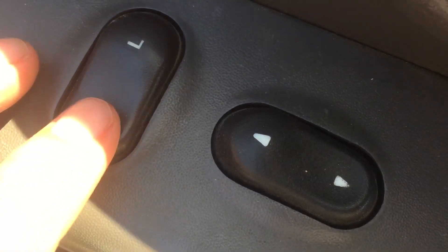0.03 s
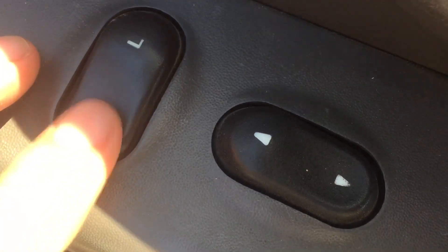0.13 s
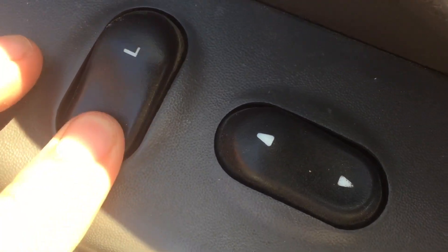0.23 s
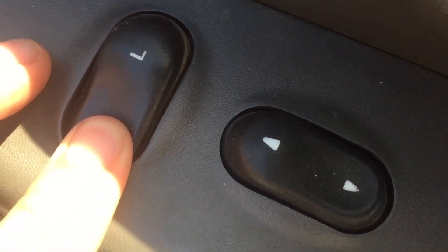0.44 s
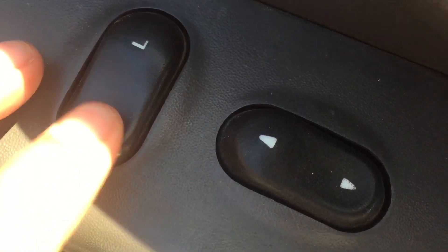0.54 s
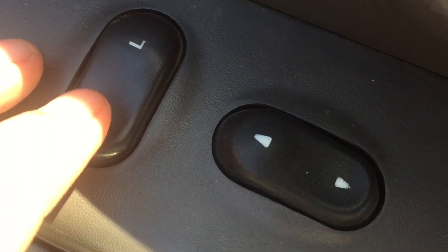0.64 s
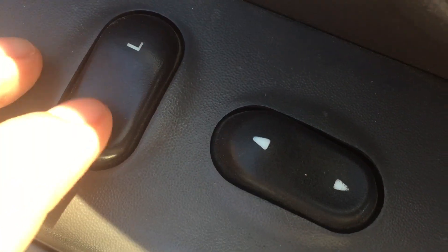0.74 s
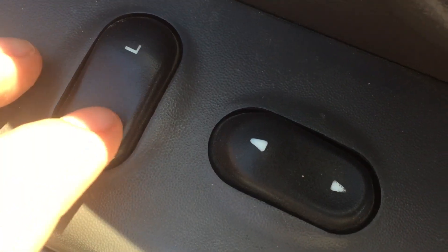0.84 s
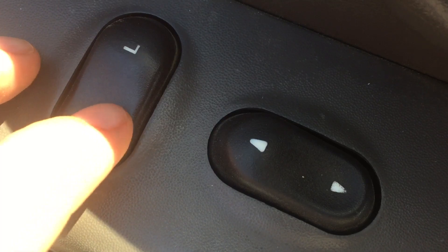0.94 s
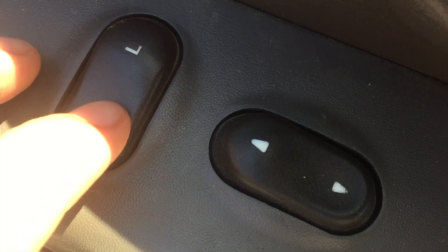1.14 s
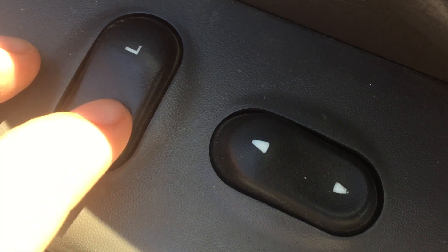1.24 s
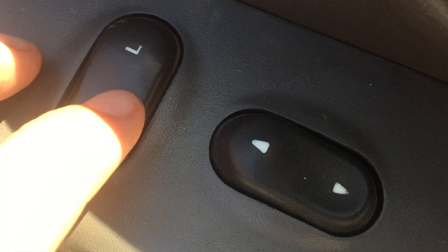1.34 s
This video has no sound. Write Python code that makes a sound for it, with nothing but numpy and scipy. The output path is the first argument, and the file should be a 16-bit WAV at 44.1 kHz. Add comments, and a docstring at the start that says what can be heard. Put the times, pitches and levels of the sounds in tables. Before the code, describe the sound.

Power door locks clunk at a switch press, then a smaller click, in an idling car.

```python
"""Power door locks in an idling car

A finger presses the lock rocker with the engine idling and the fan on. The switch snaps, the lock
motors whirr for a moment and drive the latches into their stops, and the doors thump. The rocker
is let go with a scrape and a smaller rattle of clicks. The cabin adds a short, boomy tail."""
import sys
import numpy as np
from scipy import signal
from scipy.fft import rfft, irfft
from scipy.io import wavfile
from scipy.ndimage import uniform_filter1d

SR = 44100
rng = np.random.default_rng(int(sys.argv[2]) if len(sys.argv) > 2 else 0)


def master_out(mix):
    """Clip the mix to full scale and print it as 16-bit PCM to the path in sys.argv[1]."""
    frames = np.transpose(np.atleast_2d(mix))
    ceiling = np.clip(frames, -1, 1)
    pcm = np.round(ceiling * 32767).astype(np.int16)
    wavfile.write(sys.argv[1], SR, pcm)


N = 61739
T = np.arange(N) / SR
RING_T = T[:SR // 2]


def amp(db):
    """Decibels to gain."""
    return 10 ** (np.asarray(db) / 20)


def unit(x):
    """Scales to rms 1."""
    return x / np.sqrt(np.mean(x ** 2) + 1e-20)


def read(points, hz):
    """Reads a table on a log-frequency axis."""
    f, value = np.transpose(points)
    return np.interp(np.log(hz + 1), np.log(f + 1), value)


def add(mix, start_s, sound):
    """Mixes a sound in at its start time."""
    part = mix[round(start_s * SR):][:len(sound)]
    part += sound[:len(part)]


def colour(x, spectrum):
    """Filters x by a spectrum, at rms 1."""
    hz = np.fft.rfftfreq(len(x), 1 / SR)
    return unit(irfft(rfft(x) * amp(read(spectrum, hz)), len(x)))


def band(hz, width_hz):
    """Narrow-band noise; around 0 Hz, a random drift."""
    bell = np.exp(-((np.fft.rfftfreq(N, 1 / SR) - hz) / width_hz) ** 2)
    return unit(irfft(rfft(rng.standard_normal(N)) * bell, N))


def fade(x, t60s):
    """Lets each band die at its own rate."""
    hz, t, bands = signal.stft(x, SR, nperseg=256)
    decay = amp(-60 * t / read(t60s, hz)[:, None])
    return signal.istft(bands * decay, SR, nperseg=256)[1][:len(x)]


def rise(seconds):
    """Soft onset of a blow."""
    return 1 - np.exp(-RING_T / seconds)


def ring(modes):
    """Sum of decaying sines."""
    return sum(amp(db - 60 * RING_T / t60) * np.sin(2 * np.pi * hz * RING_T) for hz, db, t60 in modes)


def engine_hum(hum_hz=108.4, harmonics_rms_db=(-43, -51, -57.5), wander=0.00768, waver_db=0.96):
    """The idling engine hums, wavering in pitch and level."""
    cycles = np.cumsum(hum_hz * (1 + wander * band(0, 5))) / SR
    out = np.zeros(N)
    for k, db in enumerate(harmonics_rms_db, 1):
        peak = np.sqrt(2) * amp(db + waver_db * band(0, 24))
        out += peak * np.sin(2 * np.pi * (k * cycles + rng.random()))
    return out


# Cabin rumble and fan air. Each row: frequency in Hz, relative density in dB.
AIR_SPECTRUM = [(20, -33), (40, -17), (60, -8), (82, 6), (100, 0), (135, -9.5), (180, -8), (240, -4.5),
                (320, -6.5), (370, -17), (560, -20), (720, -17), (850, -15), (1200, -24.5), (1400, -27),
                (1950, -27.5), (2400, -42), (4500, -42), (7000, -49.5), (12000, -55), (16000, -57)]
# Fan duct resonances. Each row: centre in Hz, width in Hz, rms level in dB.
DUCT_BANDS = [(451.7, 25, -61.5), (691.4, 17.7, -56), (754.4, 12, -63), (992, 16, -64), (1204, 58, -61)]


def fan(air_db=-43, flicker_db=1.7):
    """Rumble and rushing air flicker in patches while the duct resonates."""
    bands = signal.stft(rng.standard_normal(N), nperseg=1024)[2]
    patches = uniform_filter1d(rng.standard_normal(bands.shape), size=10, axis=0)
    patches = unit(uniform_filter1d(patches, size=8, axis=1))
    air = signal.istft(bands * amp(flicker_db * patches))[1][:N]
    duct = sum(amp(db) * band(hz, width_hz) for hz, width_hz, db in DUCT_BANDS)
    return amp(air_db) * colour(air, AIR_SPECTRUM) + duct


# Cabin reverberation. Each row: frequency in Hz, T60 in seconds.
CABIN_DECAY = [(100, 0.7), (400, 0.23), (1500, 0.17), (4000, 0.16), (12000, 0.082)]


def cabin(x):
    """Dense, quickly dying reflections off glass and trim."""
    tail = fade(rng.standard_normal(len(RING_T)), CABIN_DECAY) * rise(0.0035) ** 2
    return signal.fftconvolve(x, tail / np.linalg.norm(tail))[:N]


# Rocker scrapes. Each row: peak time in seconds, spread in seconds, level in dB.
SCRAPES = [(0.628, 0.012, -36.5), (0.659, 0.01, -35.5)]
# Sliding noise. Each row: frequency in Hz, relative density in dB.
SCRAPE_SPECTRUM = [(300, 14), (1000, 7), (1400, 5), (2200, -7.5), (3100, 4.5), (4200, -8.5), (7000, -15.5),
                   (11000, -25), (16000, -17)]


def rocker_scrapes():
    """The finger scuffs across the rocker as it swings back."""
    envelope = sum(amp(db) * np.exp(-((T - peak_s) / spread_s) ** 2) for peak_s, spread_s, db in SCRAPES)
    return colour(rng.standard_normal(N), SCRAPE_SPECTRUM) * envelope


# Rocker clicks. Each row: start in seconds, snap gain in dB, ping gain in dB, ping pitch in Hz,
# housing gain in dB, armrest gain in dB.
CLICKS = [(0.2427, -24.5, -24.5, 9140, -42.5, -41), (.2450, -16, -33, 5600, -4, -42),
          (0.2469, -52, -31, 8100, -45, -46), (0.2481, -26.5, -27.5, 3700, -13, -24),
          (.2495, -54, -31.5, 5660, -38, -42), (0.6194, -65, -37, 6900, -25, -32.5),
          (.6243, -59, -43, 4000, -36, -21.5), (0.6281, -25.5, -37.5, 8330, -34, -39),
          (0.6331, -48, -27, 3780, -47, -50), (0.634, -28, -39, 8400, -20.5, -19),
          (0.6533, -33.5, -36, 6260, -48, -32), (0.8615, -80, -54, 4020, -42, -59),
          (0.8632, -80, -52, 5430, -41, -49), (0.861, -80, -61, 8660, -56, -48),
          (1.0070, -72, -60, 1730, -33.5, -36.5)]
# Plastic snap. Each row: frequency in Hz, relative density in dB.
SNAP_SPECTRUM = [(300, -14), (1200, 15), (2500, -1), (4500, 1.5), (7000, -8.5), (9000, -7), (10800, -11),
                 (12500, -7), (16000, -15)]
# Switch housing and armrest. Each row: frequency in Hz, relative level in dB, T60 in seconds.
HOUSING_MODES = [(797, -14.5, 0.055), (984, -5, 0.014), (1127, -13, 0.034), (1407, -2.5, 0.017),
                 (1760, -46, 0.013)]
ARMREST_MODES = [(361.3, -12, 0.099), (461, -4, 0.045), (660, 0, 0.024), (882, 3.5, 0.022),
                 (1036, 3.5, 0.017)]


def rocker_clicks(t60_s=0.014, ping_width_ratio=0.065):
    """Each click is a snap of noise, a high ping and a knock of the housing and armrest."""
    out = np.zeros(N)
    hz = np.fft.rfftfreq(len(RING_T), 1 / SR)
    envelope = rise(0.00018) * amp(-60 * RING_T / t60_s)
    for start_s, snap_db, ping_db, ping_hz, housing_db, armrest_db in CLICKS:
        snap_noise, ping_noise = rng.standard_normal((2, len(RING_T)))
        snap = amp(snap_db) * colour(snap_noise, SNAP_SPECTRUM)
        resonance = 1 / (1 + ((hz / ping_hz - 1) / ping_width_ratio) ** 2)
        ping = amp(ping_db) * unit(irfft(rfft(ping_noise) * resonance, len(RING_T)))
        knock = amp(housing_db) * ring(HOUSING_MODES) + amp(armrest_db) * ring(ARMREST_MODES)
        add(out, start_s, envelope * (snap + ping) + rise(0.0014) * knock)
    return out


# Motor run. Each row: time in seconds, level in dB.
MOTOR_ENVELOPE = [(.250, -52), (.257, -26.5), (.264, -27), (.276, -28.5), (.289, -24), (.298, -24),
                  (.312, -22.5), (.322, -33), (.345, -85)]
# Gear noise. Each row: frequency in Hz, relative density in dB.
GEAR_SPECTRUM = [(60, -17), (130, 5), (300, -5.5), (440, 0.5), (580, 0.5), (800, -4.5), (1200, -2),
                 (1800, -11.5), (3800, -15.5), (6500, -31), (10000, -35.5), (16000, -52)]
# Door panel, also rung by the latches. Each row: frequency in Hz, relative level in dB, T60 in seconds.
PANEL_MODES = [(447, -9.5, 0.094), (610, -4, 0.047), (706, -13, 0.047), (729, 3, 0.065), (878, -1.5, 0.058),
               (966, -35, .08), (1180, -11, .06), (1228, -18, 0.08), (1672, -10, 0.073)]


def lock_motors(tooth_hz=144.4, jitter=0.092, pulse_depth=0.23, panel_db=-7.5):
    """Gear noise pulses at the tooth rate and shakes the door panel."""
    teeth = np.cumsum(tooth_hz * (1 + jitter * band(0, 68))) / SR
    chatter = (1 + pulse_depth * np.cos(2 * np.pi * teeth)) * rng.standard_normal(N)
    level_db = np.interp(T, *np.transpose(MOTOR_ENVELOPE), left=-120, right=-120)
    gears = amp(level_db) * colour(chatter, GEAR_SPECTRUM)
    panel = unit(signal.fftconvolve(gears, ring(PANEL_MODES))[:N])
    return gears + amp(panel_db) * np.std(gears) * panel


# Latch impacts, door by door. Each row: start in seconds, clack gain in dB, panel gain in dB.
LATCH_HITS = [(0.2994, -30, -18.5), (.3030, -22, -40), (.3085, -26, -21), (.3160, -44, -29)]
# Clack noise. Each row: frequency in Hz, relative density in dB.
CLACK_SPECTRUM = [(200, -18), (700, 6.5), (1300, -3), (2300, -12), (3800, -28), (6000, -23), (10500, -21),
                  (13000, -13), (16000, -30)]
# Clack decay. Each row: frequency in Hz, T60 in seconds.
CLACK_DECAY = [(200, 0.19), (1000, 0.093), (4000, 0.056), (12000, 0.018)]


def latches():
    """Each latch clacks against its stop and rings the door panel."""
    out = np.zeros(N)
    panel = rise(0.0017) * ring(PANEL_MODES)
    for start_s, clack_db, panel_db in LATCH_HITS:
        noise = colour(rng.standard_normal(len(RING_T)), CLACK_SPECTRUM)
        clack = rise(0.0012) * fade(noise, CLACK_DECAY)
        add(out, start_s, amp(clack_db) * clack + amp(panel_db) * panel)
    return out


# Door knocks and thumps. Each row: start in seconds, level in dB, frequency in Hz, T60 in seconds.
THUMPS = [(0.26, -25.5, 131, .05), (.2992, -10.5, 670, 0.016), (0.3069, -11.5, 181, 0.037),
          (.3160, -8.5, 266, 0.026), (0.3262, -10.5, 129.6, 0.049), (0.35, -15, 292, 0.037),
          (0.366, -27, 160, 0.052), (0.401, -39, 188, 0.06), (.431, -26, 138, 0.044),
          (.6440, -15.5, 121.3, 0.078), (0.644, -22, 205, 0.054), (0.6896, -20.5, 128, 0.05)]
# Cabin air modes. Each row: frequency in Hz, relative level in dB, T60 in seconds.
BOOM_MODES = [(87, -6.5, 0.44), (106, -27, 0.32), (156.6, 0.5, 0.15), (164.3, 8, 0.15), (199, -2.5, 0.23),
              (281, -20, 0.18)]


def door_thumps(boom_start_s=0.326, boom_db=-27.5):
    """The doors give damped, low thumps; the air in the cabin booms along with one of the later ones."""
    out = np.zeros(N)
    for start_s, db, hz, t60_s in THUMPS:
        add(out, start_s, rise(0.0019) * ring([(hz, db, t60_s)]))
    add(out, boom_start_s, amp(boom_db) * rise(0.0033) * ring(BOOM_MODES))
    return out


def scene(switch_wet_db=-18, locks_wet_db=-17, thumps_wet_db=-19):
    """Switch, locks and doors reverberate in the cabin, over engine and fan. Mono."""
    switch = rocker_clicks() + rocker_scrapes()
    locks = lock_motors() + latches()
    thumps = door_thumps()
    wet = cabin(amp(switch_wet_db) * switch + amp(locks_wet_db) * locks + amp(thumps_wet_db) * thumps)
    return (switch + locks + thumps + wet + engine_hum() + fan())[None]


def record(dry):
    """The microphone thins the deep bass; a steep low-pass cuts the top treble."""
    low_hz, high_hz = 47, 15950
    thinned = signal.sosfilt(signal.butter(2, low_hz, "high", fs=SR, output="sos"), dry)
    lowpass = signal.firwin(255, high_hz, window=("kaiser", 9), fs=SR)
    return signal.oaconvolve(thinned, lowpass[None], "same")


dry = scene()
out = record(dry)
master_out(out)
```